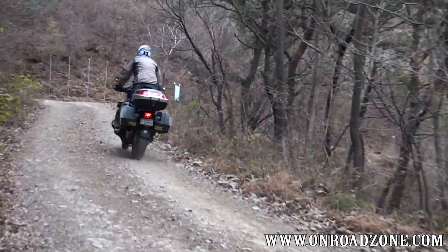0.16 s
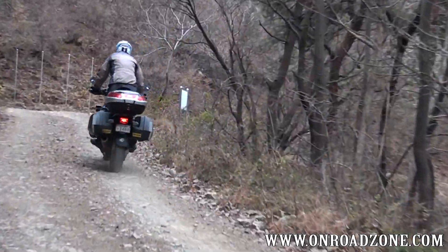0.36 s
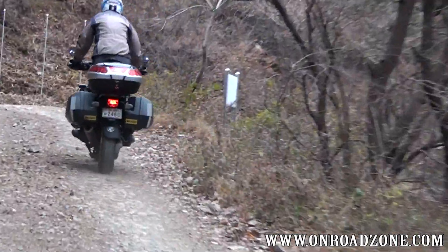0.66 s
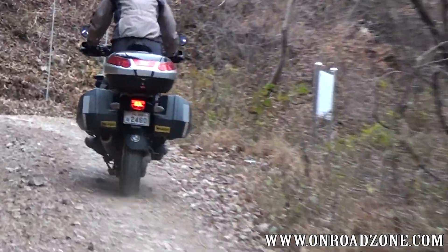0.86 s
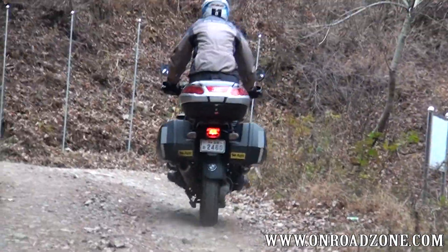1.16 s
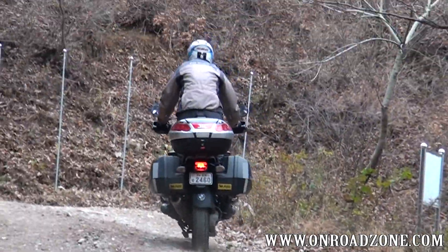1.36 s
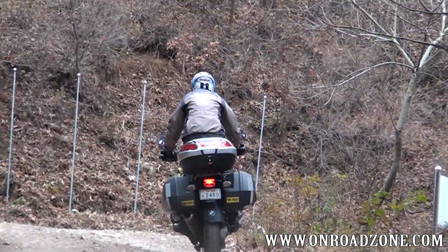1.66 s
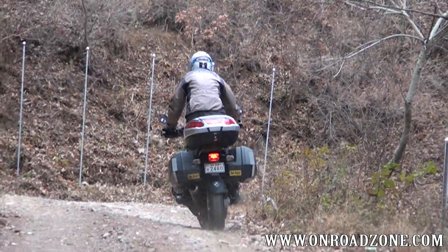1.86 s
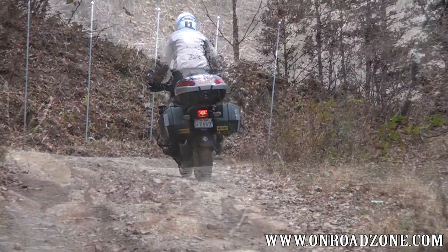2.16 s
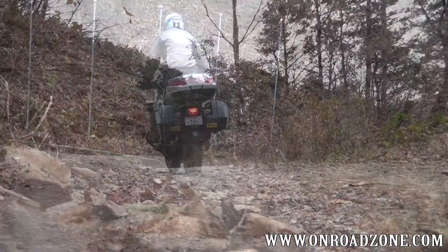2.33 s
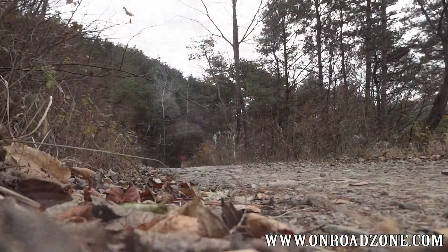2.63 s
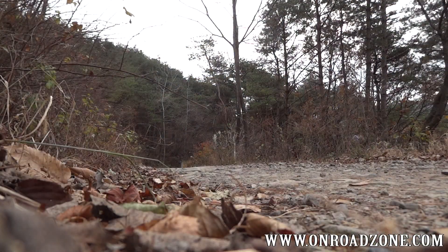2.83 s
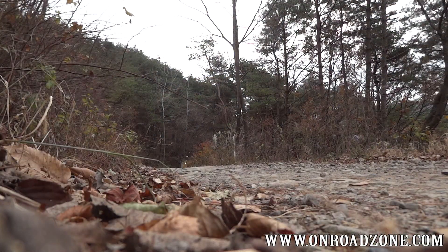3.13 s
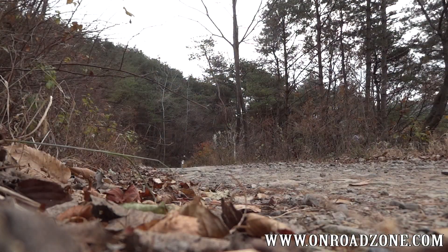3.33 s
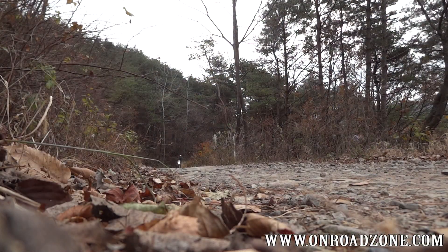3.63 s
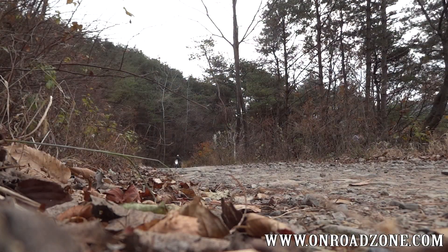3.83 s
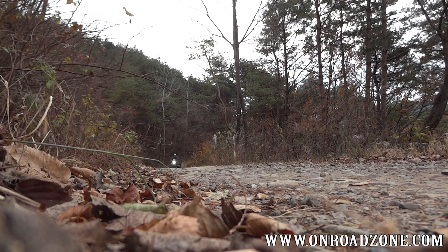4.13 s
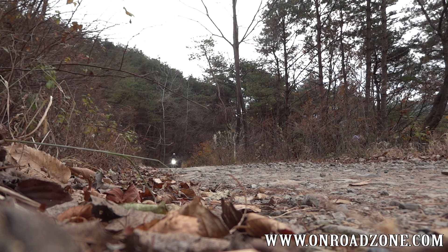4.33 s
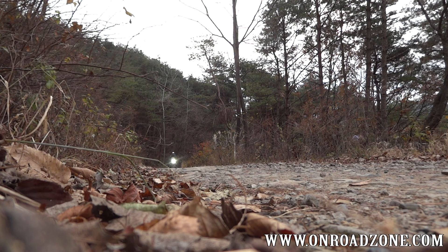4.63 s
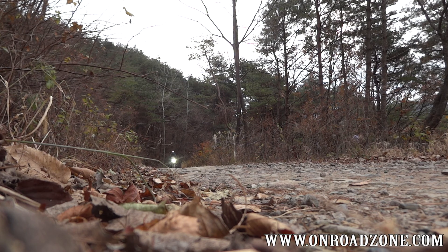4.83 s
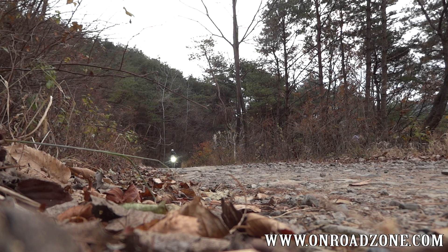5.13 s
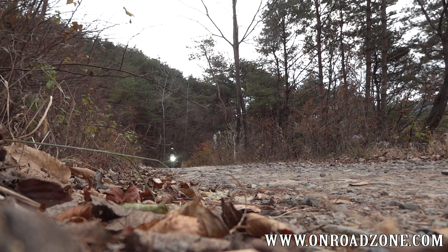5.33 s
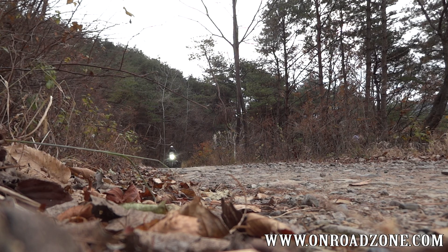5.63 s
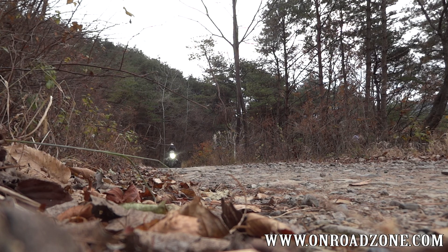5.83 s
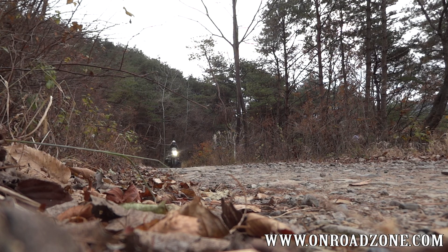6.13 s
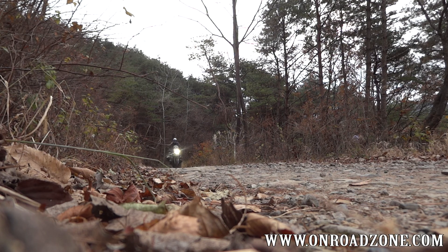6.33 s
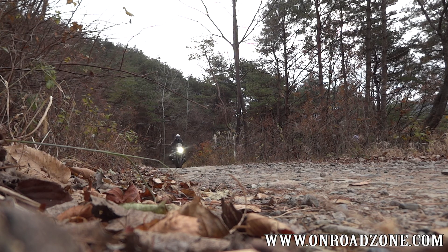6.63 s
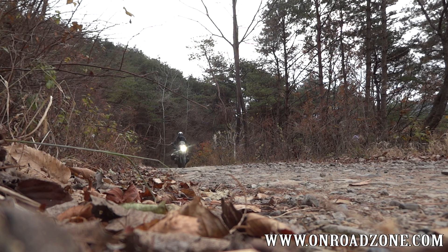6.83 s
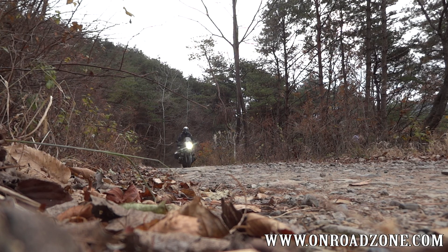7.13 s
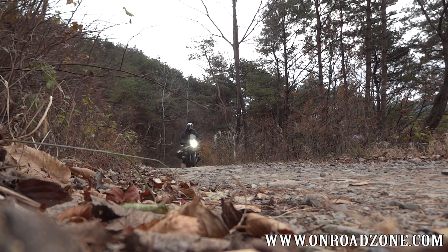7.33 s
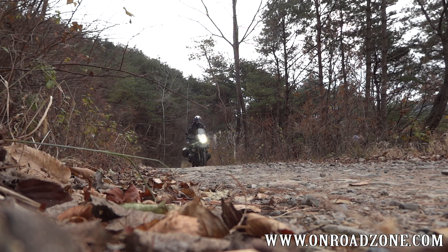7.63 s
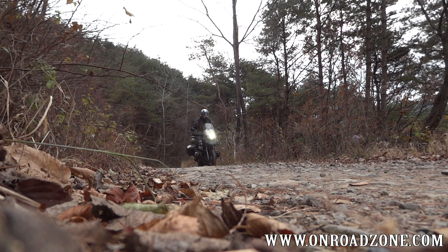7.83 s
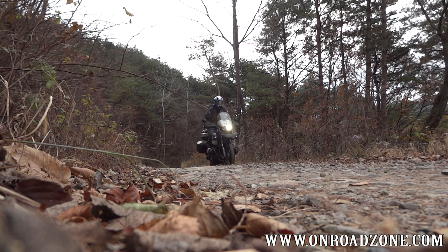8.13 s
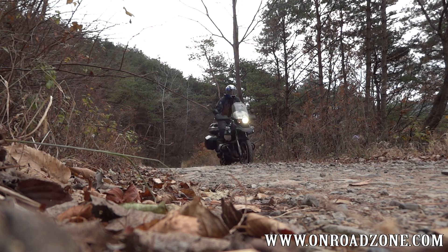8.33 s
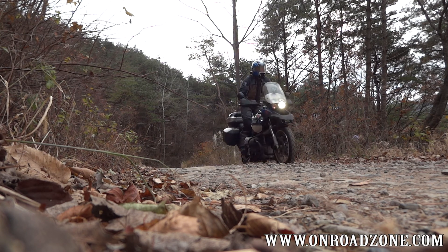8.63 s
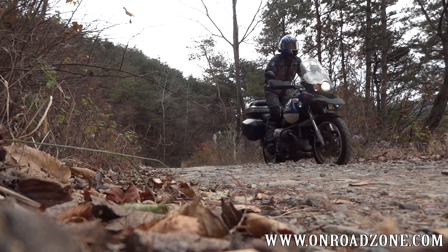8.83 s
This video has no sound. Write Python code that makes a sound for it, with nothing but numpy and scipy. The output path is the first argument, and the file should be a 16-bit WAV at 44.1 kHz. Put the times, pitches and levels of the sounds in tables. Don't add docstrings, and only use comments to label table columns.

```python
import sys
import numpy as np
from scipy import signal
from scipy.fft import rfft, irfft, next_fast_len
from scipy.io import wavfile
from scipy.ndimage import uniform_filter1d, map_coordinates

SR = 44100
rng = np.random.default_rng(int(sys.argv[2]) if len(sys.argv) > 2 else 0)


def materialize(psi):
    bounded = np.clip(np.atleast_2d(psi).T, -1, 1)
    quanta = np.round(bounded * 32767).astype(np.int16)
    wavfile.write(sys.argv[1], SR, quanta)


def voltage_ratio(decibels):
    exponent = np.asarray(decibels, float) / 20
    return 10 ** exponent


N = 395577
TIME = np.arange(N) / SR
COARSE = np.arange(0, N + 64, 32) / SR


def unit(x):
    return x / np.sqrt(np.mean(x ** 2) + 1e-20)


def along(points, hz):
    f, v = np.transpose(points)
    return np.interp(np.log(hz + 1), np.log(f + 1), v)


def curves(rows, at):
    s, *cols = np.transpose(rows)
    return [np.interp(at, s, c) for c in cols]


def noise():
    return rng.standard_normal((2, N))


def wobble(rate):
    knots = rng.standard_normal(int(N * rate / SR) + 4)
    return np.interp(TIME, COARSE, map_coordinates(knots, [COARSE * rate]))


def filtered(x, response):
    m = next_fast_len(N + SR // 2)
    return irfft(rfft(x, m) * response(np.fft.rfftfreq(m, 1 / SR)), m)[..., :N]


def stereo(pair, spectrum, alike):
    def mid_side(hz):
        turn = np.arccos(np.clip(along(alike, hz), -1, 1)) / 2
        return voltage_ratio(along(spectrum, hz)) * [np.cos(turn), np.sin(turn)]

    mid, side = filtered(pair, mid_side)
    return unit(np.array([mid + side, mid - side]))


def still_forest(alike):
    # frequency in Hz, level in dB
    insects_colour = [(1500, -60), (3000, 4), (4800, 15), (5800, 17), (6800, 3), (11200, -19), (12150, -13),
                      (13000, -20), (16000, -32)]
    return voltage_ratio(-68.5) * stereo(noise(), insects_colour, alike)


def trees(x, alike):
    # frequency in Hz, time to fall 60 dB in seconds
    tree_decay = [(100, 0.44), (500, 0.4), (2000, 0.43), (8000, 0.58)]
    hz, t, z = signal.stft(rng.standard_normal((2, SR // 2)), SR, nperseg=256)
    fall = voltage_ratio(-60 * t / along(tree_decay, hz)[:, None])
    tail = signal.istft(z * fall, SR, nperseg=256)[1]
    late = np.pad(x, (500, 0))[None]
    pair = signal.fftconvolve(late, tail / np.linalg.norm(tail[0]), axes=1)[:, :N]
    return stereo(pair, [(20, 0)], alike) * np.std(x)


def snaps(rows):
    lead = SR // 500
    out, t = np.zeros(N), np.arange(-lead, SR // 200) / SR

    def swing(cycles):
        return -np.cos(2 * np.pi * cycles) * np.exp(-((cycles - .13) / .62) ** 2)

    for s, db, hz, echo_ms, echo_db in rows:
        echo = voltage_ratio(echo_db) * swing(hz * (t - echo_ms / 1000))
        out[round(s * SR) - lead - 1:][:len(t)] += voltage_ratio(db) * (swing(hz * t) + echo)
    return out * voltage_ratio([[-.45], [.45]])


def crunch(rate, spread_db):
    hit = rng.random((2, N)) < rate * voltage_ratio(3.5 * wobble(20)) / SR
    out = np.zeros((2, N))
    size_db = spread_db * rng.exponential(size=hit.sum()).clip(0, 1.9)
    out[hit] = rng.standard_normal(hit.sum()) * voltage_ratio(size_db)
    return out


def gravel_bed(beat, colour, alike, grain):
    grind = noise() + grain * unit(crunch(rate=900, spread_db=3.5))
    return stereo(grind * voltage_ratio(2.6 * beat + 0.7 * wobble(12) + 1.6 * wobble(35)), colour, alike)


def tyre_hiss(colour, alike):
    grit = noise() + 0.77 * unit(crunch(rate=2500, spread_db=1))
    return stereo(grit * voltage_ratio(.5 * wobble(16) + .6 * wobble(40)), colour, alike)


def stones(rows, rise_s, t60_s, grit_db, pan_db, scatter_db, overtone):
    out, t = np.zeros((2, N + SR)), np.arange(SR // 12) / SR
    bright = signal.butter(2, [3000, 9000], "band", fs=SR)
    for s, db, hz, crack_db in rows:
        life, side = rng.standard_normal(2)
        ring = -np.sin(2 * np.pi * hz * t) - 0.22 * np.sin(2 * np.pi * overtone * hz * t)
        ring *= 1 - np.exp(-t / rise_s)
        ring *= voltage_ratio(-60 * t / abs(t60_s * voltage_ratio(1.5 * life)))
        crack, grit = rng.standard_normal((2, len(t)))
        crack = signal.lfilter(*bright, crack) * voltage_ratio(crack_db + 6 - 60 * t / .008)
        around_ring = signal.butter(2, [hz * .7, hz * 1.9], "band", fs=SR)
        grit = signal.lfilter(*around_ring, grit) * voltage_ratio(grit_db - 60 * t / .055)
        grit *= 1 - np.exp(-t / .002)
        left_db = (pan_db + scatter_db * side) / 2
        start = round(s * SR)
        out[:, start:start + len(t)] += voltage_ratio(db + 4) * (ring + crack + grit) * voltage_ratio([[left_db], [-left_db]])
    return filtered(out[:, :N], lambda hz: (1j * hz / (300 + 1j * hz)) ** 2)


def crank(speed):
    done = np.cumsum(curves(speed, TIME)[0]) / SR
    return done - np.interp(speed[0][0], TIME, done)


def firing_beat(speed):
    return np.exp(-3.5 * (crank(speed) % 1))


def valves(speed):
    # frequency in Hz, level in dB
    tick_colour = [(9000, -60), (12500, -14), (14300, 0), (16000, 0)]
    halves = 2 * (crank(speed) - .68)
    since_s = halves % 1 / 2 / curves(speed, TIME)[0]
    size = np.where(halves // 1 % 2, .45, 1) * voltage_ratio(3 * wobble(25) - 60 * since_s / .012)
    return unit(filtered(size * rng.standard_normal(N), lambda hz: voltage_ratio(along(tick_colour, hz))))


def gear_whine(speed, beat):
    teeth = 51
    tone = np.sin(2 * np.pi * teeth * crank(speed) + .9 * wobble(60))
    return unit(voltage_ratio(9 * beat) * (.2 + wobble(140)) * tone)


def engine_roar(beat, colour, alike, beat_db):
    return stereo(noise() * voltage_ratio(beat_db * beat + 0.44 * wobble(15)), colour, alike)


def resonance(hz, centre_hz, width_hz):
    return 1j * hz * width_hz / (centre_hz ** 2 - hz ** 2 + 1j * hz * width_hz)


def exhaust(speed, fire, pipe, boxes, turns_s, rasp, width_ms, loop_ms, loop_gain, scatter_db, heat_scatter):
    # time in seconds, level lost in dB (negative)
    weak_fires = [
        (.175, -9.5),
        (.743, -13),
        (.871, -15),
    ]
    # time in seconds, half length in seconds, lateness in ms
    wheel_jolts = [(.375, .074, 1.2), (.829, .11, 2.4), (1.111, .086, 2), (1.37, .087, 4.2),
                   (1.851, .149, 1.8), (2.047, .075, -2), (2.959, .091, .6), (3.267, .069, 2.2),
                   (3.925, .152, -2.2), (4.09, .111, 1), (4.275, .067, -2.6), (4.455, .048, -.8),
                   (4.876, .043, .8), (4.989, .272, 1.4), (5.05, .035, -.8), (5.269, .053, 2.1),
                   (5.851, .077, 1.3), (6.322, .108, -6.4), (6.714, .158, 3.5), (7.038, .058, 1.7),
                   (7.159, .061, -.8), (7.556, .025, -4.6), (8.067, .105, 2.3), (8.557, .227, 3.8),
                   (8.796, .06, -2.4)]
    cycle = crank(speed)
    half = np.arange(-1, int(2 * np.interp(speed[-1][0], TIME, cycle)))
    weak = half % 2
    chance = rng.standard_normal((len(half), 3))
    when = np.interp(half / 2, cycle, TIME)
    strong_db, share = curves(fire, when)
    size = voltage_ratio(strong_db + scatter_db * chance[:, 0])
    size *= np.where(weak, share + .045 * chance[:, 1], 1)
    for miss_s, lost_db in weak_fires:
        size *= voltage_ratio(lost_db * (abs(when - miss_s) < .008))
    rate = .5 / np.gradient(when)
    heat = np.sqrt(rate / 19) * (1 + heat_scatter * chance[:, 2])
    when = when + sum(late_ms / 1000 * np.exp(-((when - s) / half_s) ** 2) for s, half_s, late_ms in wheel_jolts)

    ms = np.arange(-SR // 200, SR // 16) * 1000 / SR
    shape = sum(loop_gain ** trip * g * np.exp(-.5 * ((ms - late_ms - trip * loop_ms) / width_ms) ** 2)
                for late_ms, g in pipe for trip in range(4))
    blows = size[:, None] * np.interp(ms * heat[:, None], ms, shape, right=0)
    at = np.round((when[:, None] + ms / 1000) * SR).astype(int)
    inside = (at >= 0) & (at < N)
    gas = np.bincount(at[inside], blows[inside], N) * (TIME / .0015).clip(0, 1)

    def outlet(hz, box):
        silencer = 1 + sum(g * resonance(hz, c, w) for c, w, g in box)
        rasp_hz, rasp_width_hz, rasp_gain = rasp
        tailpipe = rasp_gain * resonance(hz, rasp_hz, rasp_width_hz) ** 2
        open_end = (1j * hz / (38 + 1j * hz)) ** 2
        return (silencer + tailpipe) * open_end

    late = np.interp(TIME, turns_s, [0, 1])
    both = np.array([gas * (1 - late), gas * late])
    return filtered(both, lambda hz: [outlet(hz, box) for box in boxes]).sum(axis=0)


def riding_away():
    # time in seconds, four-stroke cycles per second
    speed_away = [(0.0193, 25.873), (0.8148, 23.7), (1.3799, 19.513), (2.0815, 17.958), (2.2057, 17.354),
                  (2.8, 16.431)]
    # time in seconds, strong cylinder in dB, weak cylinder's share 0-1
    fire_away = [(.02, -4, .6), (.3, -6, .64), (.5, -5, .6), (.92, -7, .68), (.98, -6.5, .4),
                 (1.46, -10, .26), (1.59, -8, .27), (2.02, -8, .05), (2.5, -8, .3)]
    # delay in ms, signed size
    pipe_away = [(-1.8, .62), (0, -1.1), (1.7, .3), (3.3, .72), (5.2, -.3), (6.3, .12), (7.6, -.28),
                 (9, -.1), (10.9, .33)]
    # centre in Hz, width in Hz, signed gain
    box_load = [(51, 17, 0.14), (104, 16, 1.34), (146.7, 15, 1.23), (289, 104, -0.31), (523, 30, 0.13),
                (560, 27, 0.77), (716, 34, -0.58)]
    box_shut = [(75.4, 11, 2.2), (144, 170, -0.12), (216, 16, 0.2), (466, 20, 2.04), (516, 37, -1.6),
                (680, 45, 1)]
    # time in seconds, peak in dB, ring in Hz, crack relative in dB
    stones_away = [(.1183, -33, 1940, -30), (.2128, -17, 1970, -29), (.3368, -12, 2030, -33),
                   (.4319, -22.5, 1970, -23), (.5272, -24, 1790, -25), (.6235, -31, 1920, -28),
                   (.6449, -25, 2120, -21), (.7173, -23, 2100, -21), (.8255, -14.5, 1950, -35),
                   (.8885, -25, 2030, -15), (.9043, -23, 1810, -25), (.9892, -19.5, 2040, -21),
                   (1.0365, -23, 2210, -6), (1.0915, -16, 1940, -21), (1.1475, -22, 2260, -36),
                   (1.2108, -25, 2040, -30), (1.257, -30, 2040, -28), (1.296, -16.5, 2160, -29),
                   (1.3128, -15.5, 2000, -28), (1.346, -22, 1920, -33), (1.4533, -29, 2200, -29),
                   (1.497, -14, 2036, -23.5), (1.5429, -31, 1940, -25), (1.6506, -33, 2120, -27),
                   (1.674, -23.5, 2220, -16), (1.7534, -18.5, 2060, -27), (1.8103, -20.5, 3000, -29),
                   (1.8512, -19.5, 2100, -29), (1.9335, -27, 2020, -28), (1.9644, -25, 2050, -13),
                   (2.03, -38, 1520, -7), (2.2598, -28.5, 2080, -6.5), (2.4094, -32.5, 1740, -9.5),
                   (2.486, -21, 1950, -24)]
    # time in seconds, peak in dB, ring in Hz, echo in ms, echo in dB
    snaps_away = [
        (1.0361, -18, 6300, .16, 0),
        (1.0364, -7.5, 1800, .75, -11),
        (1.0363, -17, 3600, 1.2, -8),
    ]
    # time in seconds, nearness in dB
    tyres_away = [(0, -3.5), (1.1, -5.5), (1.85, -6.5), (2.4, -11.5)]
    # frequency in Hz, level in dB
    roar_away = [(15, -26), (40, 8), (62, 3), (90, -5), (150, -8), (250, -6), (400, -1), (700, -16),
                 (1150, -16), (1500, -21), (2500, -120)]
    gravel_away = [(410, -45), (700, 3.5), (780, -3), (1180, -8.5), (1330, -16.5), (1990, -5.5),
                   (2490, -11.5), (3000, -10), (6000, -27.5), (7800, -70), (13200, -120)]
    hiss_away = [(2350, -50), (4000, -6), (4650, -5), (5970, -4.5), (8210, -9), (9890, -11), (10800, -9.5),
                 (14200, -11.5), (15300, -27), (16000, -87)]
    # frequency in Hz, left-right likeness -1 to 1
    alike_away = [(60, 0.75), (150, 1), (380, 0.99), (950, 1), (2400, 0.93), (6000, 0.059), (9600, -0.34),
                  (10600, -0.95), (15000, -0.51)]

    beat = firing_beat(speed_away)
    tyres_db, = curves(tyres_away, TIME)
    roar_db = curves(fire_away, TIME)[0] - 22.5
    around = voltage_ratio(roar_db) * engine_roar(beat, roar_away, alike_away, beat_db=4.5)
    around += voltage_ratio(tyres_db - 29.5) * gravel_bed(beat, gravel_away, alike_away, grain=0.79)
    around += voltage_ratio(0.76 * tyres_db - 41.5) * tyre_hiss(hiss_away, alike_away)
    around += voltage_ratio(-48) * gear_whine(speed_away, beat)

    hits = stones(stones_away, rise_s=.0011, t60_s=.012, grit_db=-7, pan_db=3.5, scatter_db=3, overtone=2.02)
    hits += snaps(snaps_away)
    blows = exhaust(speed_away, fire_away, pipe_away, (box_load, box_shut), turns_s=(0.83, 1.17),
                    rasp=(711, 343, 4.1), width_ms=.66, loop_ms=13, loop_gain=.3,
                    scatter_db=.8, heat_scatter=.018)
    near = blows * voltage_ratio([[.8], [-.8]]) + hits
    near += voltage_ratio(-18) * trees(blows + hits.mean(axis=0), alike_away)
    return (near + around) * np.interp(TIME, (1.747, 2.844), [1, 0])


def coming_near():
    # time in seconds, four-stroke cycles per second
    speed_near = [(2.8453, 16.66), (3.4295, 17.03), (4.0261, 19.059), (5.1217, 21.112), (6.2991, 19.92),
                  (6.5664, 18.828), (6.7102, 19.463), (7.8749, 17.271), (8.97, 16.331)]
    # time in seconds, strong cylinder in dB, weak cylinder's share 0-1
    fire_near = [(2.9, -42.5, 0.16), (3.15, -41, 0.15), (3.4, -38.5, 0.23), (3.9, -34.5, 0.36),
                 (5, -31.5, 0.11), (5.3, -29.5, 0.029), (6.9, -22.5, 0.012), (7.3, -25, 0.17),
                 (8, -21.5, 0.089), (8.75, -16.5, 0.27)]
    # delay in ms, signed size
    pipe_near = [(-1.2, .38), (0, -1.3), (1.2, .25), (2.4, .25), (4, .72), (5.2, -.18), (6, -.25),
                 (6.9, .12), (7.9, -.22), (8.8, .2), (9.9, -.2), (11, .5), (11.9, .15)]
    # centre in Hz, width in Hz, signed gain
    box_far = [(72, 8.3, 1.6), (102, 4.7, 0.016), (140.5, 5, 0.49), (206, 7.3, 0.63), (313, 25, -0.61),
               (378, 15, 0.51), (503, 40, 1.2), (625, 55, 0.08), (692, 43, 1.3)]
    box_close = [(98.4, 4.9, -1.2), (139, 11.6, 0.71), (194, 10, 2.2), (327, 32, -0.28), (375, 40, -0.19),
                 (500, 38, 1.1), (646, 34, 1.8), (671, 35, 1.9)]
    # time in seconds, peak in dB, ring in Hz, crack relative in dB
    stones_near = [(5.9439, -28, 990, -31), (6.0162, -27, 1190, -23), (6.0632, -34, 1000, -28),
                   (6.0851, -28, 940, -27), (6.122, -24.5, 980, -28), (6.1474, -25.5, 1120, -25),
                   (6.2462, -27, 1160, -26), (6.2786, -22.5, 1000, -21), (6.3194, -28, 1100, -23),
                   (6.4718, -31, 1090, -30), (6.655, -40, 2100, -30), (6.68, -33, 1830, -28),
                   (6.7641, -23, 1080, -30), (6.8938, -27, 1130, -30), (6.9321, -22, 1100, -40),
                   (6.983, -26, 925, -25), (7.032, -25, 1130, -30), (7.0729, -28, 1050, -25),
                   (7.1072, -24, 1200, -28), (7.21, -34, 1750, -28), (7.2709, -31, 1180, -28),
                   (7.165, -32.5, 2370, -22), (7.2321, -31, 900, -30), (7.3194, -23, 1160, -26),
                   (7.5269, -24.5, 1900, -30), (7.612, -26, 2050, -30), (7.622, -31, 2300, -28),
                   (7.63, -24, 1820, -35), (7.652, -34, 2600, -23), (7.7548, -19.5, 1780, -17),
                   (7.8242, -27, 1810, -30), (7.9778, -23, 1440, -31), (8.0785, -20.5, 1000, -40),
                   (8.1159, -28, 2000, -28), (8.2013, -19.5, 1550, -28), (8.2612, -22, 1200, -18),
                   (8.3331, -38, 1230, -28), (8.4024, -21, 1810, -23), (8.4543, -31, 1290, -25),
                   (8.4766, -18, 945, -28), (8.487, -30, 2500, -17), (8.519, -31, 2200, -20),
                   (8.536, -26, 2000, -20), (8.589, -28, 1940, -28), (8.6199, -32, 1740, -28),
                   (8.6423, -16, 1960, -25), (8.7, -23, 1880, -20), (8.7287, -17, 2030, -25),
                   (8.754, -14.5, 2120, -20), (8.8214, -17, 1760, -24), (8.9037, -12, 1630, -30),
                   (8.9386, -8.5, 1610, -27)]
    # time in seconds, peak in dB, ring in Hz, echo in ms, echo in dB
    snaps_near = [(2.8012, -52, 4000, 1, 0), (2.8033, -50, 4500, 1.3, -2), (2.8065, -42, 5600, 1, 1),
                  (2.8071, -42, 4600, .9, 0), (2.8088, -45, 5000, 1.3, -3), (3.4596, -49, 4600, .7, -5),
                  (3.94605, -7.5, 1780, 1.85, -19), (3.9464, -31, 3500, .28, 0),
                  (3.94605, -34, 5000, .2, 0), (3.9479, -42, 5600, .18, 0), (3.9462, -49, 7500, .4, -3),
                  (3.9492, -33, 1900, 1, -1), (3.9514, -33, 1600, 1.3, -3), (3.9555, -36, 2200, 1.6, -3),
                  (4.1066, -51, 4400, .7, -5), (4.2461, -32.5, 5000, .7, -4)]
    # time in seconds, half length in seconds, change in dB
    loose_patches = [(6.078, .07, 3), (6.19, .04, 4), (6.29, 0.062, 7), (6.51, 0.057, -1.5),
                     (6.698, 0.068, 2.5), (6.93, 0.04, 2), (7.325, 0.067, 5), (7.614, 0.089, 4.5),
                     (7.762, 0.014, 10), (7.687, 0.025, -2), (8.222, 0.026, 2.5), (8.39, 0.016, 3),
                     (8.474, 0.014, 3), (8.536, 0.01, 2), (8.57, 0.0087, -6), (8.656, 0.012, 9),
                     (8.822, 0.014, 5.5), (8.68, .012, -1.5), (8.857, 0.02, -4), (8.917, .01, -2),
                     (3.3, .45, -2.5), (5.95, 0.085, -2), (8.95, 0.01, 4.5)]
    # time in seconds, level over the firing in dB
    whine_load = [(2.9, -22), (3.4, -25), (3.8, -33), (4.7, -28), (5, -22), (5.8, -21.5), (6.31, -20),
                  (6.38, -32), (6.9, -30), (8, -50)]
    # frequency in Hz, level in dB
    roar_near = [(40, -34), (75, -20), (150, -5), (260, -2.5), (380, 2.5), (520, -1), (640, -4), (780, -13),
                 (1080, -5), (1500, -12.5), (2500, -120)]
    gravel_near = [(30, -11), (410, 4), (760, 2.5), (967, 4.5), (1390, -1), (2060, -0.5), (2440, -8),
                   (4150, -18.5), (5150, -73), (6000, -15), (7800, -64), (13200, -120)]
    hiss_near = [(150, -29), (2350, 3), (4000, -2.5), (5440, -8.5), (6740, -4.5), (7440, -6.5), (8070, -5),
                 (10900, -6), (11500, -7), (12150, -1.5), (12900, -8), (14800, -2.5), (15500, 1.5),
                 (16000, -28)]
    # frequency in Hz, left-right likeness -1 to 1
    alike_near = [(60, 0.75), (300, 0.68), (1000, 0.64), (3800, 0.89), (6000, 0.97), (10000, 1)]

    arrives_s, approach_mps = 9.335, 8.55
    metres = approach_mps * (arrives_s - TIME).clip(.2)
    tyres_db = -20 * np.log10(metres)
    loose = sum(db * np.exp(-((COARSE - s) / half_s) ** 2) for s, half_s, db in loose_patches)
    loose_db = np.interp(TIME, COARSE, loose)
    gravel_db = tyres_db - 0.15 * metres - 15 + loose_db
    hiss_db = 1.282 * tyres_db - 0.069 * metres - 16.5 + .45 * loose_db
    firing_db = curves(fire_near, TIME)[0]
    whine_db = firing_db + curves(whine_load, TIME)[0]

    beat = firing_beat(speed_near)
    around = still_forest(alike_near)
    around += voltage_ratio(gravel_db) * gravel_bed(beat, gravel_near, alike_near, grain=0.88)
    around += voltage_ratio(hiss_db) * tyre_hiss(hiss_near, alike_near)
    around += voltage_ratio(hiss_db + 3 + .3 * tyres_db - 8) * valves(speed_near)
    around += voltage_ratio(whine_db) * gear_whine(speed_near, beat)
    around += voltage_ratio(firing_db - 20.5) * engine_roar(beat, roar_near, alike_near, beat_db=-8)

    hits = stones(stones_near, rise_s=.0003, t60_s=.008, grit_db=-7, pan_db=0, scatter_db=0, overtone=1.35)
    hits += snaps(snaps_near)
    blows = exhaust(speed_near, fire_near, pipe_near, (box_far, box_close), turns_s=(6.78, 7.5),
                    rasp=(1163, 315, 10.1), width_ms=.42, loop_ms=13, loop_gain=.6,
                    scatter_db=.9, heat_scatter=.008)
    blows = filtered(blows, lambda hz: (1j * hz / (56 + 1j * hz)) ** 3)
    near = blows + hits + voltage_ratio(-14) * trees(blows + .3 * hits.mean(axis=0), alike_near)
    return (near + around) * np.interp(TIME, (2.3, 2.85), [0, 1])


def scene():
    return riding_away() + coming_near()


def treble_survives(hz, t):
    from_hz, band_hz = 10350, 690
    band = ((hz - from_hz) // band_hz).clip(0).astype(int)
    shared_luck = unit(uniform_filter1d(rng.standard_normal(len(t)), size=3))
    luck = 1.1 * rng.standard_normal((band.max() + 1, len(t))) + shared_luck
    lucky = luck[band] > np.interp(t, (1.95, 2.2), [-.25, -4])
    return lucky | (hz[:, None] < from_hz) | (t < .03)


def roll_off(x):
    return signal.sosfilt(signal.butter(12, 16230, fs=SR, output="sos"), x)


def record(dry):
    # start in seconds, highest frequency in Hz
    treble_limit = [(0, 15000), (1.92, 14300), (2.65, 13700), (5.62, 14300), (7.18, 15200), (8.3, 15850)]

    def lead(hz):
        turn = np.pi * hz * 3.35 / SR / (1 + (hz / 2500) ** 2)
        return np.exp(1j * turn * np.array([[1], [-1]]))

    hz, t, z = signal.stft(filtered(dry, lead), SR, nperseg=2048)
    since_s, top_hz = np.transpose(treble_limit)
    limit_hz = top_hz[np.searchsorted(since_s, t, "right") - 1]
    kept = treble_survives(hz, t) & (hz[:, None] < limit_hz)
    mix = signal.istft(z * kept, SR, nperseg=2048)[1][:, :N]
    return roll_off(mix)


dry = scene()
out = record(dry)
materialize(out)
```